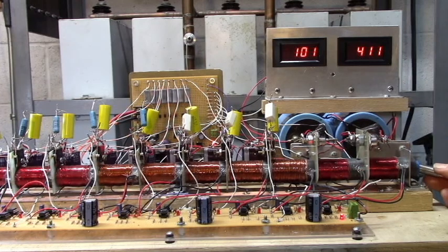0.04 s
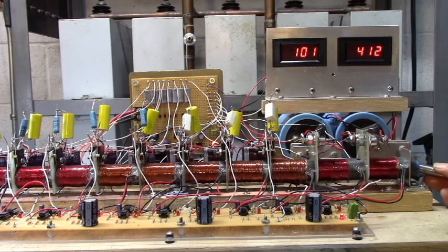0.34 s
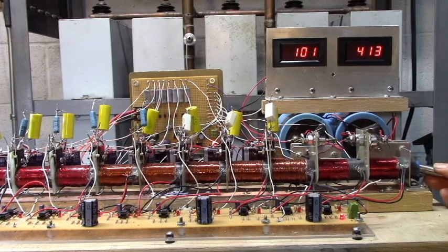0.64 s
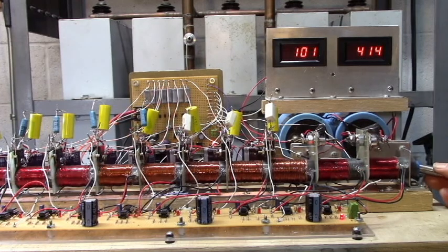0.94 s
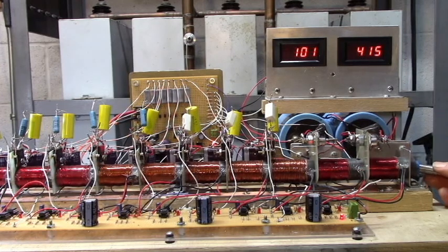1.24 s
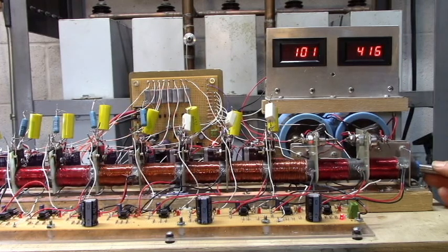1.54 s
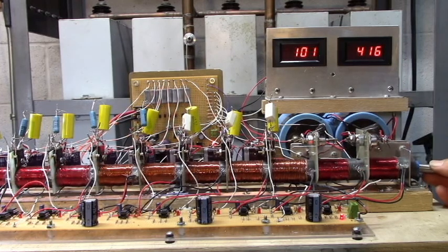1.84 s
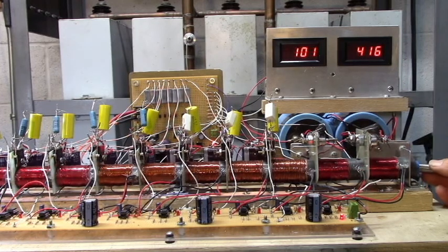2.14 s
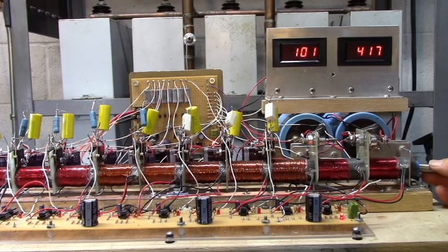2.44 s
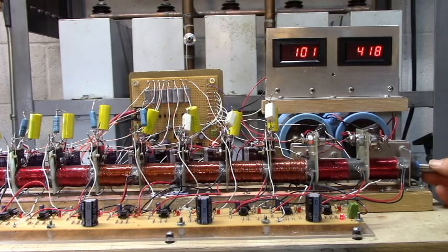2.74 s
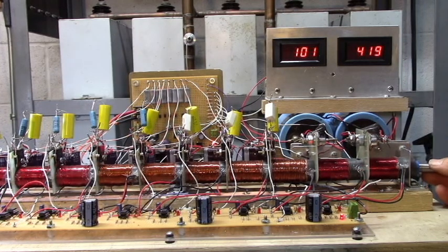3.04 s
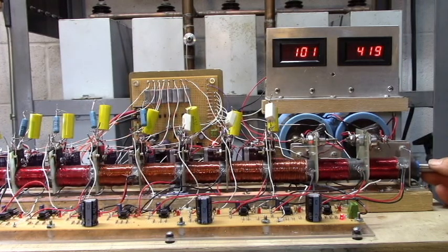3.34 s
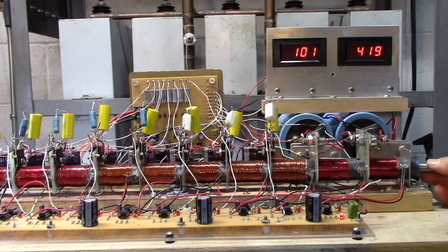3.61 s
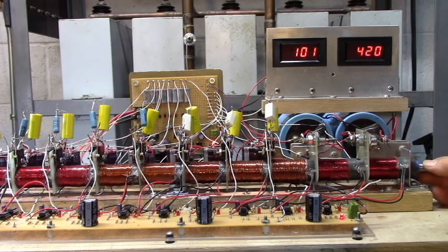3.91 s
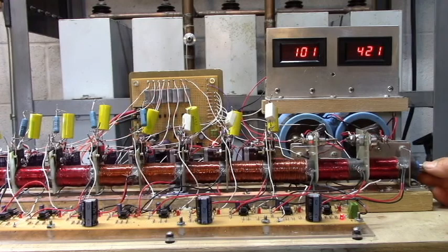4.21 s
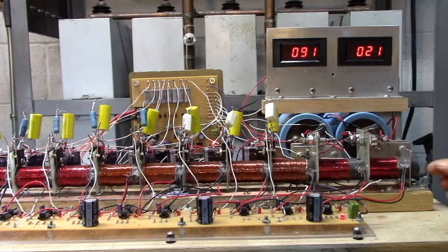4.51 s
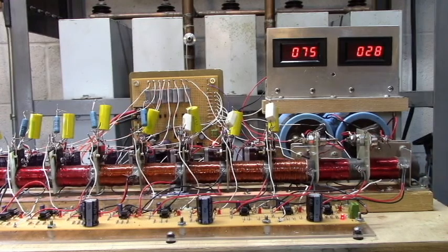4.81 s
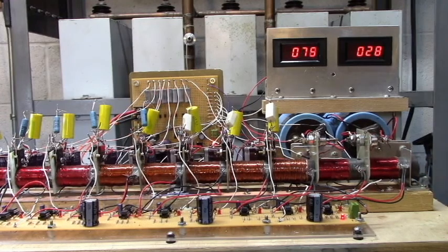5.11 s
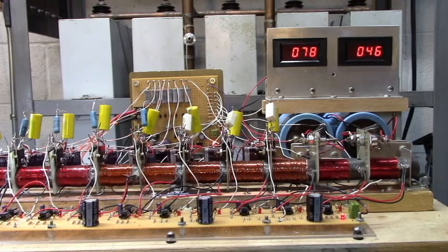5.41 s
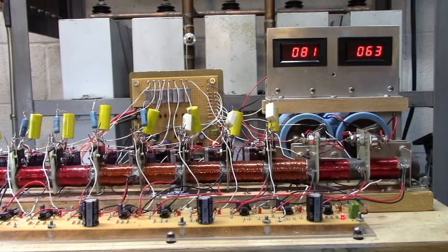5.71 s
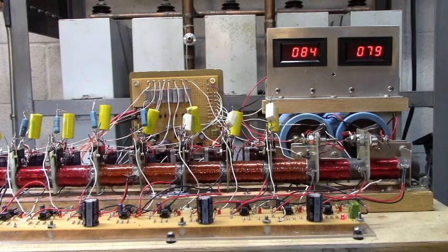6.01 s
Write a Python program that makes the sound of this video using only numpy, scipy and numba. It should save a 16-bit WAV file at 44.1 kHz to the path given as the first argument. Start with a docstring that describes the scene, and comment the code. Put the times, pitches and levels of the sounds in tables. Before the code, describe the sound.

Heard up close in a small workshop, a low, steady electrical hum runs under faint distant ticking and a light click. After about four seconds, a metal slug is nudged into a coil gun, which goes off with a sudden loud bang: a bright crack joined to a hollow, crunching thud and a quick clatter. The short echo dies away, the slug settles with soft bumps, and cloth brushes quietly over the hum.

```python
"""A workshop bench with a multi-stage coil gun on it. The gun's charger hums and buzzes, a far clock
ticks, a switch clicks, and fingers slide a metal slug into place. The coils fire within a few
milliseconds, each one jerking the barrel. The slug slams into a hollow backstop and tumbles; the
room rings and a limiter holds the bang down. A sleeve rustles as the hand draws back."""
import sys
import numpy as np
from scipy import signal
from scipy.fft import rfft, irfft
from scipy.io import wavfile
from numba import njit

SR = 44100
rng = np.random.default_rng(int(sys.argv[2]) if len(sys.argv) > 2 else 0)


def to_wav(s):
    """Save 16-bit WAV."""
    ch = np.atleast_2d(s).T  # columns
    pcm = np.round(np.clip(ch, -1, 1) * 32767)  # PCM
    wavfile.write(sys.argv[1], SR, pcm.astype(np.int16))


N = 276110
T = np.arange(N) / SR

# The tone of a sharp crack, from a coil or the slug. Each row: frequency in Hz, level in dB.
CRACK_TONE = [(30, -33), (120, -13.5), (300, 7), (600, 7), (1100, -4), (1780, 2), (2150, -6), (2750, -3),
              (4700, -7), (7000, -11.5), (9300, -11), (12000, -21.5), (16000, -23)]


def undb(db):
    """Turn decibels into a number to multiply by."""
    return 10 ** (np.asarray(db) / 20)


def unit(x):
    """Scale a sound to an average (rms) level of 1."""
    return x / np.sqrt(np.mean(x ** 2))


def at_hz(points, hz):
    """Read between (Hz, value) points, with every octave equally wide."""
    frequencies, values = np.transpose(points)
    return np.interp(np.log(hz + 1), np.log(frequencies), values)


def through(x, response):
    """Pass a sound through a body or room, given how that responds to one click."""
    return signal.oaconvolve(x, response)[:N]


def colour(tone, size=4096):
    """A filter's response to one click, with the given (Hz, dB) tone and an energy of 1."""
    cepstrum = irfft(np.log(undb(at_hz(tone, np.linspace(0, SR / 2, size // 2 + 1)))))
    # folding the second half onto the first keeps the filter from sounding before the click
    cepstrum[1:size // 2] *= 2
    cepstrum[size // 2 + 1:] = 0
    response = irfft(np.exp(rfft(cepstrum)))
    return response / np.linalg.norm(response)


def low_cut(x, hz, order):
    """Remove the bass below hz; a higher order cuts more steeply."""
    return signal.sosfilt(signal.butter(order, hz, "high", fs=SR, output="sos"), x)


def fade(t, t60):
    """Die away smoothly; t60 is the fade time, the seconds it takes to drop 60 dB."""
    return np.exp(-np.log(1000) * t / t60)


def swell(peak_s, db, attack_s, release_s):
    """Loudness of a movement: up 20 dB over the attack, down 20 dB over the release."""
    return undb(db - 20 * np.maximum((peak_s - T) / attack_s, (T - peak_s) / release_s))


def ring(notes, t=T[:SR]):
    """A struck body rings with one fading note for each (Hz, dB, fade time) row."""
    return sum(undb(db) * fade(t, t60) * np.sin(2 * np.pi * hz * t) for hz, db, t60 in notes)


def rub(loudness, tone):
    """Noise with the given tone and loudness."""
    return through(loudness * rng.standard_normal(N), colour(tone))


def bursts(rows, tone):
    """Contact noise: each (seconds, dB, fade time) row starts at once and dies away."""
    loudness = np.zeros(N)
    for s, db, t60 in rows:
        start = int(s * SR)
        t = T[:min(SR, N - start)]
        loudness[start:start + len(t)] += undb(db) * fade(t, t60)
    return rub(loudness, tone)


def clinks(rows, tone, ring_db, width_hz):
    """A click of noise with a brief ring for each (seconds, dB, fade time, Hz) row."""
    out = 0
    for s, db, t60, hz in rows:
        click = bursts([(s, db, t60)], tone)
        ringing = signal.lfilter(*signal.iirpeak(hz, hz / width_hz, fs=SR), click)
        out = out + click + undb(ring_db) * ringing
    return out


def pushes(rows):
    """A rounded push for each (seconds, dB, contact time) row; longer contact sounds duller."""
    force = np.zeros(N)
    for s, db, contact_s in rows:
        start, length = int(s * SR), max(int(contact_s * SR), 2)
        pulse = np.sin(np.pi * (np.arange(length) + .5) / length)
        force[start:start + length] += undb(db) * pulse / pulse.sum()
    return force


def workshop(build_s=0.0035, bands=16):
    """The room's echo: reflections build up, then each band of pitches dies at its own rate."""
    # How long the room rings. Each row: frequency in Hz, fade time in seconds.
    fade_times = [(100, .42), (250, .5), (600, 0.43), (1500, 0.43), (4000, 0.4), (8000, .3), (11000, .235),
                  (15000, 0.19)]
    t, hz = T[:SR], np.arange(SR // 2 + 1)
    noise = rfft(rng.standard_normal(SR))
    edges = np.r_[0, np.geomspace(100, SR / 2, bands)]
    tail = 0
    for low, high in zip(edges, edges[1:]):
        band = irfft(noise * ((hz >= low) & (hz < high)), SR)
        tail = tail + band * fade(t, at_hz(fade_times, (low + high) / 2))
    tail *= 1 - np.exp(-(t / build_s) ** 2)
    return tail / np.linalg.norm(tail)


def air(mid_db=-59.5, side_db=-65):
    """Steady room air and hiss: mid is the same in both ears, side is opposite in each."""
    # The tones of the two parts of the hiss. Each row: frequency in Hz, level in dB.
    mid_tone = [(25, -34.5), (70, -10.5), (130, -3), (250, 2.5), (550, 1), (1000, -3.5), (1700, -5),
                (2300, -11), (3800, -12.5), (6000, -16.5), (10000, -20.5), (14000, -25.5), (16000, -46.5)]
    side_tone = [(40, 3), (90, -7), (180, -5), (700, -1.5), (1400, -10), (2800, -15), (5600, -22),
                 (11000, -36.5), (15000, -42)]
    return rub(undb(mid_db), mid_tone), rub(undb(side_db), side_tone)


def charger(mains_hz=60.0, hum_db=-51.5, buzz_db=-73, sizzle_db=-11, waver_db=-0.45, tick_s=0.0029):
    """The transformer hums at twice the mains rate; the rectifier ticks brightly every half cycle."""
    # The notes of the hum. Each row: multiple of twice the mains frequency, relative level in dB.
    hum_notes = [(1, -25), (2, -1), (3, -2.5), (4, -13), (6, -9), (7, -19.5), (8, -21), (9, -34),
                 (10, -13.5), (11, -20.5), (12, -24), (15, -27.5), (27, -25.5)]
    # What each tick rings. Each row: pitch in Hz, relative level in dB, fade time in seconds.
    tick_notes = [(9190, -7.5, 0.0051), (10150, -7, 0.0018), (11300, -8.5, 0.0035), (13870, -1, 0.003)]
    hum = 0
    for multiple, db in hum_notes:
        waver = np.interp(T, np.linspace(0, T[-1], 20), rng.standard_normal(20))
        cycles = multiple * 2 * mains_hz * T + rng.random()
        hum = hum + undb(db + waver_db * waver) * np.sin(2 * np.pi * cycles)
    since_tick = (T - tick_s) % (1 / (2 * mains_hz))
    buzz = ring(tick_notes, since_tick)
    sizzle = through(fade(since_tick, t60=.002) * rng.standard_normal(N), ring(tick_notes))
    return undb(hum_db) * unit(hum) + undb(buzz_db) * (unit(buzz) + undb(sizzle_db) * unit(sizzle))


def clock(room, period_s=1.0, t60=.07, direct_db=-8, room_db=2):
    """Far ticks and tocks, each with a brief ring of the case, arrive mostly by way of the walls."""
    # The tick and the tock. Each row: first start in seconds, level in dB, ring pitch in Hz.
    tick_tock = [(.135, -55, 2550), (.41, -55.5, 4200)]
    # The tone of a tick. Each row: frequency in Hz, level in dB.
    tick_tone = [(200, -34), (700, 0.5), (1100, 7), (1900, -1), (2900, 2), (4200, -5.5), (6500, -10.5),
                 (12000, -23.5)]
    beats = [(s, db, t60, hz) for first, db, hz in tick_tock for s in np.arange(first, T[-1], period_s)]
    ticks = clinks(beats, tick_tone, ring_db=1.5, width_hz=200)
    return undb(direct_db) * ticks + undb(room_db) * through(ticks, room)


def sleeve(grain_db=3, slip_samples=120):
    """Cloth slides in tiny uneven slips as the arm draws back."""
    # The brushes of the sleeve. Each row: loudest moment in seconds, level in dB.
    brushes = [(5.92, -63.5), (6.2, -54)]
    # The tone of the cloth. Each row: frequency in Hz, level in dB.
    cloth_tone = [(100, -16), (500, 0), (1000, 1), (1900, 0), (3000, -6), (6500, -11.5), (10000, -22),
                  (15000, -32)]
    slips = np.repeat(rng.standard_normal(N // slip_samples + 1), slip_samples)[:N]
    rustle = rub(undb(grain_db * slips), cloth_tone)
    return unit(rustle) * sum(swell(s, db, attack_s=0.16, release_s=0.43) for s, db in brushes)


def handling(room, click_t60=.05, nudge_t60=.08, room_db=-4):
    """Small clicks and scrapes; fingers slide the slug in and nudge it into the first coil."""
    # Switch and handling clicks. Each row: start in seconds, level in dB, ring pitch in Hz.
    click_times = [(1.522, -59, 1620), (2.3716, -39.5, 2530), (2.3764, -41, 3330), (2.384, -49, 1330),
                   (2.433, -55, 1320), (4.187, -52, 1570)]
    # Brief, bright scrapes. Each row: loudest moment in seconds, level in dB.
    scrape_times = [(.432, -50), (1.53, -60), (2.443, -54)]
    # Nudges of the slug, the last one hardest. Each row: start in seconds, level in dB.
    nudge_times = [(4.187, -46), (4.238, -47.5), (4.294, -43), (4.308, -40.5)]
    # The tones of the switch, a scrape and the slug going in. Each row: frequency in Hz, level in dB.
    switch_tone = [(100, -31), (400, 5.5), (950, -4), (1320, 2.5), (1900, -2), (2550, 0.5), (2900, -1),
                   (3330, 0), (4200, -7), (5150, -4), (7000, -9.5), (10000, -16.5), (15000, -38)]
    scrape_tone = [(400, -9), (1500, 6), (3400, 3.5), (5500, -4), (9000, -13), (15000, -28)]
    loading_tone = [(80, -33.5), (250, -6), (420, -2.5), (750, -5.5), (1100, -19), (1600, -15),
                    (2400, -27.5), (8000, -48.5)]
    click_rows = [(s, db, click_t60, hz) for s, db, hz in click_times]
    clicks = clinks(click_rows, switch_tone, ring_db=10.5, width_hz=120)
    scraping = sum(swell(s, db, attack_s=.025, release_s=.045) for s, db in scrape_times)
    scrapes = rub(scraping, scrape_tone)
    slide = rub(swell(peak_s=3.9, db=-55.5, attack_s=.22, release_s=.3), loading_tone)
    nudges = bursts([(s, db, nudge_t60) for s, db in nudge_times], loading_tone)
    direct = clicks + scrapes + slide + nudges
    return direct + undb(room_db) * through(direct, room)


def coil_pulses(count=8, fire_s=4.3309, travel_s=.0075, first_db=-9.5, growth_db=5.5):
    """(seconds, dB) of each coil: evenly spaced coils fire ever sooner and harder as the slug speeds up."""
    speed = np.sqrt(np.linspace(0, 1, count))  # share of the final speed, under a steady push
    return list(zip(fire_s + travel_s * speed, first_db + growth_db * speed))


def launch(room, crack_db=-5, crack_t60=.014, barrel_db=-11, room_db=1, barrel_room_db=-9):
    """Each pulse of current jerks its coil: a crack and a short ring of the barrel. A spark follows."""
    # The barrel and coil spools. Each row: pitch in Hz, level in dB, fade time in seconds.
    barrel_notes = [(390, -9, 0.13), (1710, -7.5, .08), (1804, 4, .035), (2470, -5, .025),
                    (2790, -0.5, .035), (3750, -6, .03), (4630, -7, .025), (7520, -13, .012),
                    (8600, -7.5, 0.0097)]
    # A spark snaps at a contact. Each row: start in seconds, level in dB, fade time in seconds.
    sparks = [(4.3502, -11.5, 0.0044)]
    # The tone of the spark. Each row: frequency in Hz, level in dB.
    spark_tone = [(200, -22.5), (6000, -11.5), (8200, -9.5), (9500, 7.5), (11000, -9.5), (15000, -20.5)]
    crack = undb(crack_db) * bursts([(s, db, crack_t60) for s, db in coil_pulses()], CRACK_TONE)
    jerks = pushes([(s, db, 2 / SR) for s, db in coil_pulses()])
    barrel = undb(barrel_db) * through(jerks, ring(barrel_notes))
    echo = through(undb(room_db) * crack + undb(barrel_room_db) * barrel, room)
    return low_cut(crack + barrel + echo, hz=150.5, order=2) + bursts(sparks, spark_tone)


def backstop(room, contact_s=0.00051, softening=.39, boom_db=-17, boom_room_db=-17, smack_db=-14,
             smack_t60=.015, crunch_db=-7, crunch_t60=0.032, crunch_growth=1.2, crunch_room_db=1.0):
    """The slug smacks home, tumbles and settles; its blows crunch and set the hollow box booming."""
    # The slug's blows on the box. Each row: start in seconds, strength in dB.
    blows = [(4.3735, 4), (4.3918, -8.5), (4.4096, -5.5), (4.4396, -6.5), (4.4569, -8), (4.67, -35),
             (4.725, -32.5), (4.768, -34)]
    # The panels of the box. Each row: pitch in Hz, level in dB, fade time in seconds.
    panel_notes = [(146, 4, .22), (158.4, 0.5, 0.39), (208.1, -6, 0.59), (221.3, -0.5, 0.25),
                   (245.6, -1, 0.65), (272.5, 2, .26), (305, 2, .15), (363, -2, 0.13), (385, -5.5, 0.23),
                   (491.6, 4.5, 0.31), (531, 1.5, .36), (584.2, 5.5, 0.28), (605.8, 4, .22),
                   (749, -0.5, 0.2), (762, -2, 0.07)]
    # The tone of the crunch. Each row: frequency in Hz, level in dB.
    crunch_tone = [(30, -28.5), (118, -28), (136, 0.5), (160, 0), (183, -2.5), (215, 4.5), (300, 2),
                   (420, -1), (590, 4.5), (1000, -6.5), (1600, -4.5), (2400, -14), (4500, -23.5),
                   (8000, -30.5), (15000, -56)]
    # softer blows stay in contact longer
    force = pushes([(s, db, contact_s * undb(-softening * db)) for s, db in blows])
    boom = undb(boom_db) * through(force, ring(panel_notes))
    # crunch grows faster than force, so the last soft bumps mostly boom
    crunch_rows = [(s, crunch_growth * db, crunch_t60) for s, db in blows]
    crunch = undb(crunch_db) * bursts(crunch_rows, crunch_tone)
    smack = bursts([(blows[0][0], smack_db, smack_t60)], CRACK_TONE)
    echo = through(undb(crunch_room_db) * crunch + undb(boom_room_db) * boom, room)
    # a box this small gives off almost nothing below its lowest note
    return low_cut(boom + crunch + smack + echo, hz=130, order=14)


def scene():
    """All sources in one room; two close microphones differ only a little, mostly in the treble."""
    # The stereo width. Each row: frequency in Hz, level of side compared with mid in dB.
    width = [(120, -45.5), (250, -41), (500, -28.5), (1000, -25), (2000, -21.5), (4000, -17.5), (8000, -16),
             (14000, -19.5)]
    room = workshop()
    events = launch(room) + backstop(room) + handling(room) + clock(room) + sleeve()
    air_mid, air_side = air()
    scatter = rng.standard_normal(SR) * fade(T[:SR], t60=0.1)
    side_gain = undb(at_hz(width, np.arange(SR // 2 + 1)))
    scatter = irfft(rfft(scatter / np.linalg.norm(scatter)) * side_gain)
    mid = air_mid + events
    side = air_side + through(events, scatter[:SR // 8])
    return np.array([mid + side, mid - side]) + charger()


@njit
def follow(x, attack, release):
    """Track a level, rising at the attack rate and falling at the release rate."""
    out, level = np.empty(len(x)), 0.
    for i in range(len(x)):
        level += (x[i] - level) * (attack if x[i] > level else release)
        out[i] = level
    return out


def record(dry, limit_db=-5.0, attack_s=.0012, release_s=0.039, top_hz=15800):
    """A limiter turns the bang down, the first peaks are flattened, and the highest treble is cut."""
    peak = follow(np.abs(dry).max(axis=0), 1 / (attack_s * SR), 1 / (release_s * SR))
    gain = np.minimum(1, undb(limit_db) / (peak + 1e-9))
    held = np.clip(dry * gain, -1, 1)
    return signal.sosfilt(signal.ellip(10, .2, 80, top_hz, fs=SR, output="sos"), held)


dry = scene()
out = record(dry)
to_wav(out)
```